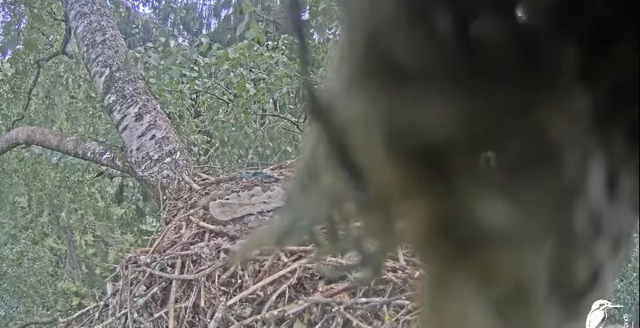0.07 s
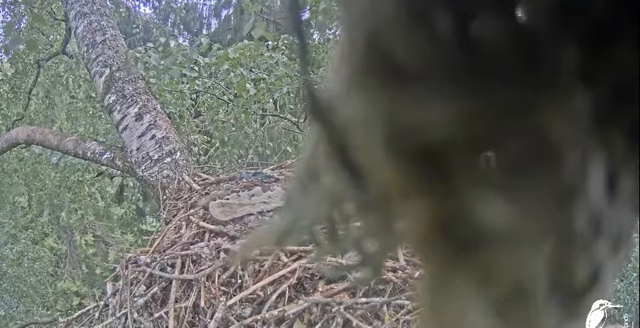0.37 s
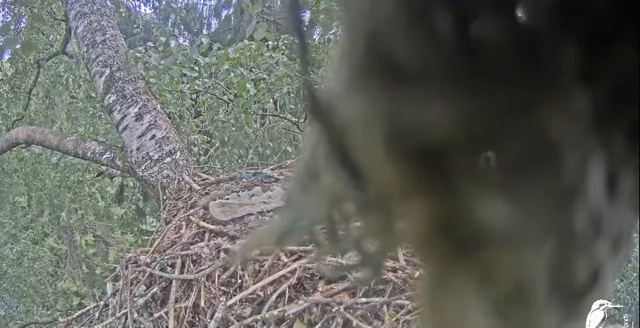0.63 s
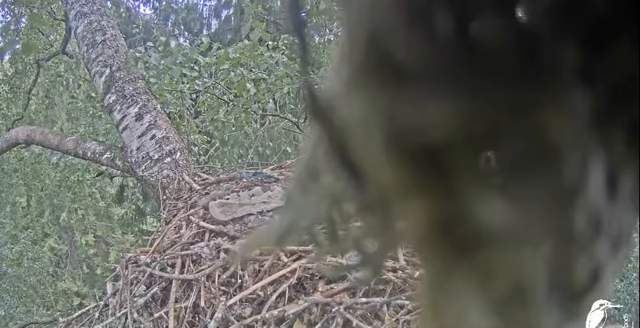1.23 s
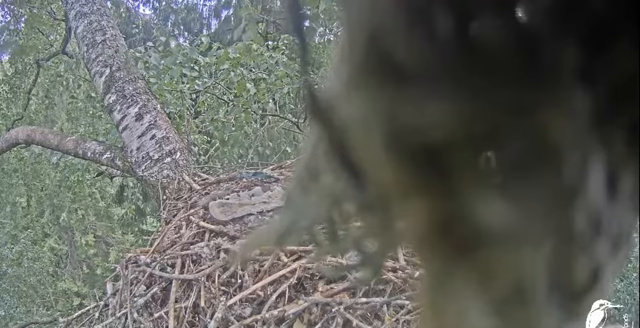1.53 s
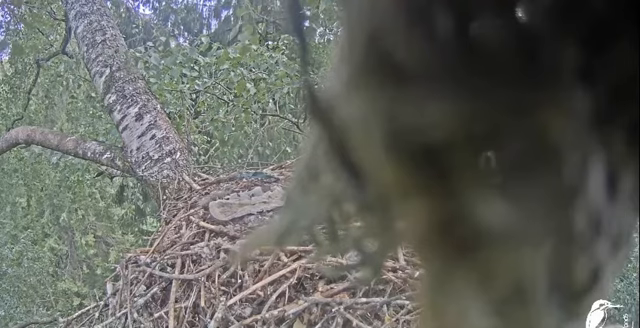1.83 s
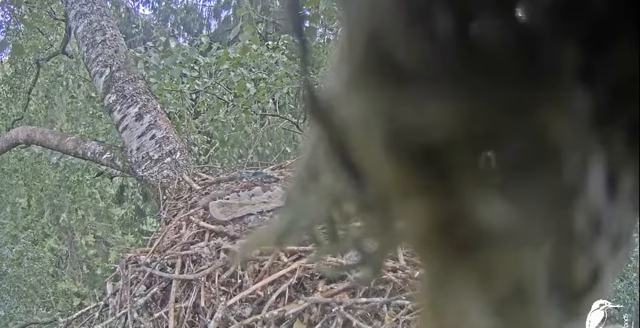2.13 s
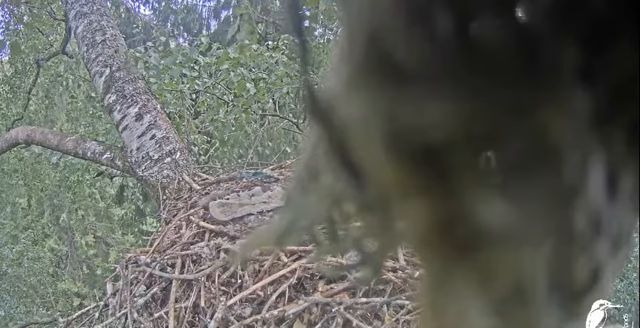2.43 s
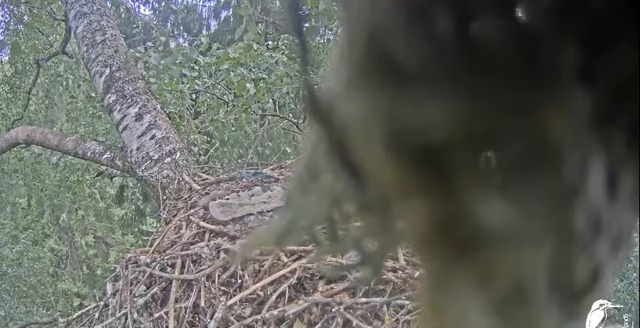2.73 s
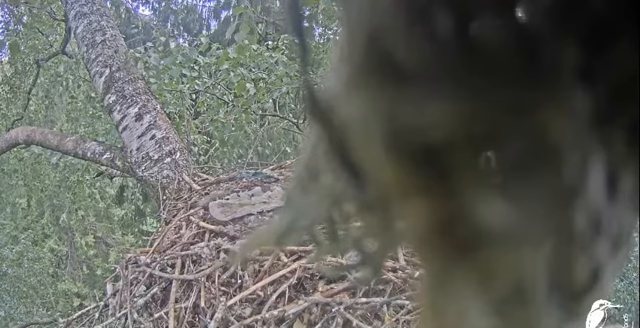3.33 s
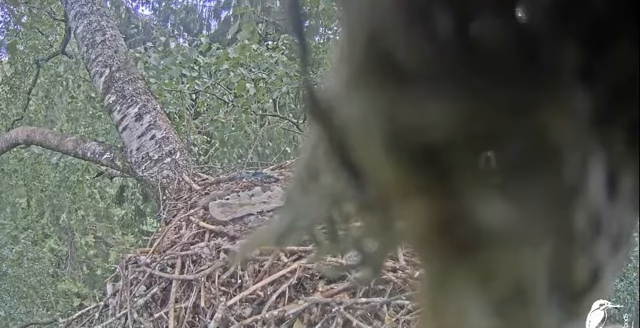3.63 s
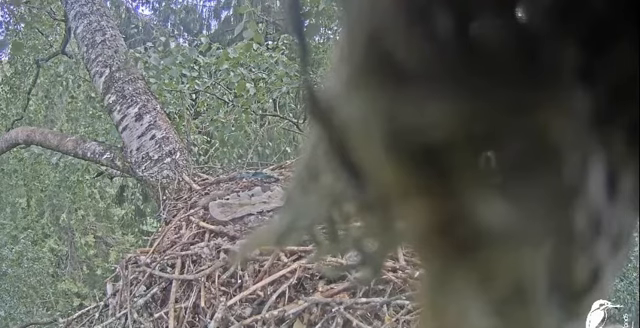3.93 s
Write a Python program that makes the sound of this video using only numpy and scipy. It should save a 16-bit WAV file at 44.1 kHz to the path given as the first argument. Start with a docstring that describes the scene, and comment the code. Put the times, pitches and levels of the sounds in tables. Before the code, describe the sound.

A bird, likely a raptor, calls near a forest nest in thin, wavering whistles that turn hoarse and break into quick yodels. The calls echo away, then after a pause one more follows. A faint hiss continues throughout.

```python
"""Forest, near a nest, one microphone, a faint steady hiss throughout. A bird, likely a raptor, opens with a
thin whistle that sags and turns hoarse, then breaks into a yodel flipping between a low and a high register.
A clear whistle, more yodel and a closing whistle follow; from 1.8 s the echoes from trunks and leaves die
away. At 3.25 s a last whistle rises, sags hoarse and breaks into two yodel notes. Every call is a near-sine
from the syrinx, which jitters, doubles its period and rasps under strain."""
import sys
import numpy as np
from scipy import signal
from scipy.fft import rfft, irfft
from scipy.io import wavfile

SR = 44100
rng = np.random.default_rng(int(sys.argv[2]) if len(sys.argv) > 2 else 0)


def log_audio(samples):
    """Write samples as a 16-bit WAV file to the path given in sys.argv[1]."""
    # one column per channel
    frames = np.atleast_2d(samples).T
    # limit to full scale, then quantise
    limited = np.clip(frames, -1, 1)
    pcm = np.round(limited * 32767).astype(np.int16)
    wavfile.write(sys.argv[1], SR, pcm)


N = 176400

# Spectrum of the background hiss: (frequency [Hz], relative density [dB])
HISS_SPECTRUM = [(25, -5), (74, -8), (113, -13.5), (200, -18.5), (400, -21), (900, -25.5), (1500, -27),
                 (2050, -24.5), (2400, -21.5), (2750, -14), (3100, -23), (3500, -29.5), (4000, -33.5),
                 (5000, -37.5), (8000, -39.5), (14000, -43.5)]
# Long whistles at the bird, one curve each: (time [s], pitch [Hz], level [dB], rasp before boost [dB],
# overtone at 1.5 x pitch [dB re the tone], octave overtone [dB])
HOARSE_CURVE = [(-.02, 2660, -33.5, -38.5, -26.5, -66.5), (.06, 2550, -46, -55.5, -29, -71),
                (.12, 2520, -51.5, -47.5, -17, -62.5), (.185, 2540, -51.5, -48.5, -14.5, -59),
                (.25, 2590, -46, -50.5, -16.5, -66.5), (.283, 2720, -29.5, -53.5, -33, -58),
                (.308, 2740, -36, -61, -41, -63), (.332, 2560, -39, -45.5, -12.5, -54),
                (.376, 2790, -31, -48, -38.5, -66), (.39, 2790, -20, -58.5, -36, -65.5)]
CLEAR_CURVE = [(.76, 2633, -51.5, -66, -33, -74), (0.829, 2704, -43, -64.5, -42, -65),
               (.88, 2724, -38, -61.5, -47, -63), (0.947, 2760, -30, -55, -47, -67),
               (1.0, 2744, -38.5, -77, -34, -62), (1.039, 2560, -60, -61, -40, -55.5)]
CLOSING_CURVE = [(1.38, 2680, -45, -45.5, -25, -69), (1.433, 2587, -32.5, -51.5, -11, -55),
                 (1.46, 2769, -29.5, -44, -40, -61), (1.522, 2648, -43, -69, -37, -60),
                 (1.569, 2673, -35, -58, -38, -63), (1.631, 2496, -47, -69, -33, -59),
                 (1.699, 2584, -44, -60, -44, -64), (1.772, 2506, -49.5, -82, -33, -75)]
RISING_CURVE = [(3.246, 2466, -60, -53, -46, -62), (3.278, 2774, -40.5, -62, -40, -62),
                (3.314, 2945, -41.5, -58, -45, -56.5), (3.382, 2851, -38, -61, -52, -64),
                (3.478, 2902, -41, -64, -45, -64), (3.545, 2822, -37, -65, -44, -64.5),
                (3.6, 2773, -37, -57, -33, -63.5), (3.649, 2625, -52.5, -55, -17, -57.5),
                (3.724, 2508, -47, -48.5, -13.5, -59), (3.826, 2554, -50, -50.5, -9, -61),
                (3.879, 2810, -32.5, -51, -32, -65), (3.938, 2573, -47.5, -44, -22, -53)]
# Yodel notes at the bird: (start [s], length [s], start pitch [Hz], middle pitch [Hz], end pitch [Hz],
# level [dB], swell from start to end [dB], rasp before boost [dB],
# overtone at 1.5 x pitch [dB re the tone], octave overtone [dB])
YODEL_NOTES = [ (.0, 0.072, 3150, 3550, 2740, -43, 1.5, -61.5, -31, -85),
               (.385, 0.037, 3410, 3504, 3270, -46.5, 11, -48.5, -38.5, -78),
               (0.421, 0.023, 2720, 2726, 2630, -37, -16, -51, -29, -68.5),
               (0.44, 0.022, 2573, 2712, 2826, -29.5, 18, -48.5, -30.5, -57),
               (0.457, 0.067, 3520, 3653, 3210, -43, -1.5, -61, -37, -80),
               (0.52, 0.04, 2746, 2693, 2880, -31, 14.5, -46, -32, -63),
               (0.554, 0.09, 3450, 3915, 3230, -45.5, 10.5, -53, -36, -88),
               (0.646, 0.041, 2852, 2537, 2340, -40, -27.5, -47.5, -34, -60),
               (0.656, 0.048, 3760, 3380, 2950, -47.5, 5.5, -65, -35, -79),
               (.944, 0.056, 4360, 4540, 4800, -55, -4.5, -72, -41, -93.5),
               (0.996, 0.15, 4560, 4640, 4320, -59, 2, -57.5, -47, -88),
               (1.043, 0.025, 2650, 2762, 2740, -34, 8.5, -63, -30, -69),
               (1.044, 0.018, 3530, 3520, 3150, -55, -3, -72, -43, -85),
               (1.139, .066, 3815, 3606, 3406, -45, 11, -56, -34, -79),
               (1.186, 0.067, 2980, 2963, 2790, -46.5, -4, -64, -36, -85),
               (1.205, 0.099, 3400, 3535, 3380, -40.5, -5.5, -61, -35, -73),
               (1.289, 0.078, 2675, 2755, 2890, -40.5, 10, -59, -20.5, -64),
               (1.346, 0.039, 3450, 3533, 3190, -40, 2, -69, -33, -69.5),
               (3.934, 0.036, 2603, 2792, 2900, -32.5, 3, -46.5, -30, -62),
               (3.971, 0.047, 3570, 3695, 3280, -42.5, -6, -64, -47, -71)]
# Spectrum of the rasp in the voice: (frequency [Hz], relative density [dB])
RASP_SPECTRUM = [(1500, -40.5), (2250, -22.5), (2550, 7), (3000, 2), (3300, -5), (3750, -5.5),
                 (4200, -19.5), (4700, -13), (5300, -17.5), (6000, -22.5), (7500, -28.5), (10000, -41)]
# Direct sound at the microphone, rising and falling against its echoes: (time [s], gain [dB])
DIRECT_GAIN = [(0, -5.5), (.2, 1), (.28, 0.5), (.95, 0), (1.37, 2), (1.45, -3.5), (1.6, -9), (1.85, 4),
               (3.25, -5.5), (3.55, 1), (4, 1.5)]

HISS_DB = -54.5
WAVER_SHARE, WAVER_HZ = 0.0046, 45  # share of the pitch while steady, rate
STEADY_HZ, UNSTEADY_PER_HZ = 2650, 0.0094  # the waver grows as the pitch sags below this
JITTER_SHARE, JITTER_HZ = 0.004, 600  # share of the pitch at full strain, rate
FLUTTER_DB, FLUTTER_HZ = 1.9, 49.3
THIRD_DB, HALF_DB = -23, -16  # third harmonic re the octave; tone at half pitch re the one at 1.5 x
RASP_BOOST_DB = 3.5
WHISTLE_EDGE_S, NOTE_EDGE_S = 0.0076, 0.0034
FOLIAGE_HZ, FOLIAGE_DB = 4400, -2.5
TRUNKS_DB, TRUNKS_DECAY_S, TRUNK_ECHOES_PER_S = -9, 0.062, 400
TAIL_DB, TAIL_BUILD_S, TAIL_T60_S = -6.5, 0.01, 1.08
TOP_HZ, DC_OFFSET = 14100, 0.0242


def undb(db):
    """Decibels to gain."""
    return 10 ** (np.asarray(db) / 20)


def wander(hz):
    """Smooth random drift of spread 1 that changes up to about hz times a second."""
    drift = signal.sosfilt(signal.butter(2, hz, fs=SR, output="sos"), rng.standard_normal(N))
    return drift / drift.std()


def noise(spectrum):
    """Noise of rms 1, shaped by points of (frequency [Hz], relative density [dB])."""
    hz, db = np.array(spectrum).T
    f = np.maximum(np.arange(N // 2 + 1) * SR / N, 1)
    gain = undb(np.interp(np.log(f), np.log(hz), db)) * (f > 15)
    shaped = irfft(rfft(rng.standard_normal(N)) * gain, N)
    return shaped / shaped.std()


def gate(t, start, end, edge):
    """Opens at start and shuts at end, with rounded edges."""
    return np.sin(np.pi / 2 * np.clip(np.minimum(t - start, end - t) / edge, 0, 1)) ** 2


def hiss():
    """The faint, steady noise floor of the place."""
    return undb(HISS_DB) * noise(HISS_SPECTRUM)


def syrinx(hz, db, rasp_db, split_db, octave_db, chance):
    """A wavering near-sine with weak overtones; when strained it jitters, doubles its period and rasps."""
    waver, jitter, flutter, rasp = chance
    strain = np.minimum(undb(rasp_db - db), 1)
    unsteady = 1 + UNSTEADY_PER_HZ * np.maximum(STEADY_HZ - hz, 0)
    pitch = hz * (1 + WAVER_SHARE * unsteady * waver + JITTER_SHARE * strain * jitter)
    phase = 2 * np.pi * np.cumsum(pitch) / SR
    period_doubling = undb(split_db) * (np.sin(1.5 * phase) + undb(HALF_DB) * np.sin(phase / 2))
    tone = undb(db) * (np.sin(phase) + period_doubling)
    overtones = undb(octave_db) * (np.sin(2 * phase) + undb(THIRD_DB) * np.sin(3 * phase))
    voice = np.sqrt(2) * (tone + overtones) * undb(FLUTTER_DB * flutter)
    return voice + undb(rasp_db + RASP_BOOST_DB) * rasp


def whistles(t, chance):
    """Four long whistles: the syrinx glides along curves of pitch, level and hoarseness."""
    out = np.zeros(N)
    for curve in (HOARSE_CURVE, CLEAR_CURVE, CLOSING_CURVE, RISING_CURVE):
        times, *columns = np.array(curve).T
        on = (t >= times[0]) & (t < times[-1])
        controls = [np.interp(t[on], times, column) for column in columns]
        out[on] += gate(t[on], times[0], times[-1], WHISTLE_EDGE_S) * syrinx(*controls, chance[:, on])
    return out


def yodel(t, chance):
    """Short notes that flip between registers, each an arch of pitch that swells or fades."""
    out = np.zeros(N)
    for start, length, start_hz, middle_hz, end_hz, db, swell_db, *timbre in YODEL_NOTES:
        on = (t >= start) & (t < start + length)
        u = (t[on] - start) / length - 0.5  # zero at the middle of the note
        hz = middle_hz + (end_hz - start_hz) * u + 2 * (start_hz + end_hz - 2 * middle_hz) * u ** 2
        note = syrinx(hz, db + swell_db * u, *timbre, chance[:, on])
        out[on] += gate(t[on], start, start + length, NOTE_EDGE_S) * note
    return out


def foliage(calls):
    """Leaves between bird and microphone shade the treble, so overtones lose some direct sound."""
    f = np.arange(N // 2 + 1) * SR / N
    shelf_db = FOLIAGE_DB * (1 - 1 / (1 + (f / FOLIAGE_HZ) ** 10))
    return irfft(rfft(calls) * undb(shelf_db), N)


def forest(t, calls):
    """The direct sound, separate echoes from near trunks, then a smooth tail from the trees beyond."""
    direct = foliage(calls) * undb(np.interp(t, *np.array(DIRECT_GAIN).T))
    trunks = rng.standard_normal(N) * (rng.random(N) < TRUNK_ECHOES_PER_S / SR)
    trunks *= np.exp(-t / TRUNKS_DECAY_S)
    tail = rng.standard_normal(N) * (1 - np.exp(-t / TAIL_BUILD_S))
    tail *= undb(-60 * t / TAIL_T60_S)
    echoes = undb(TRUNKS_DB) * trunks / np.linalg.norm(trunks)
    echoes += undb(TAIL_DB) * tail / np.linalg.norm(tail)
    return direct + signal.fftconvolve(calls, echoes)[:N]


def scene():
    """At the microphone, in mono: one bird heard through the trees, over the hiss."""
    t = np.arange(N) / SR
    chance = np.array([wander(WAVER_HZ), wander(JITTER_HZ), wander(FLUTTER_HZ), noise(RASP_SPECTRUM)])
    calls = whistles(t, chance) + yodel(t, chance)
    return (forest(t, calls) + hiss())[None]


def record(dry):
    """The recorder cuts the top and rests slightly off zero."""
    lowpass = signal.ellip(8, 0.2, 60, TOP_HZ, fs=SR, output="sos")
    return signal.sosfilt(lowpass, dry) + DC_OFFSET


dry = scene()
out = record(dry)
log_audio(out)
```